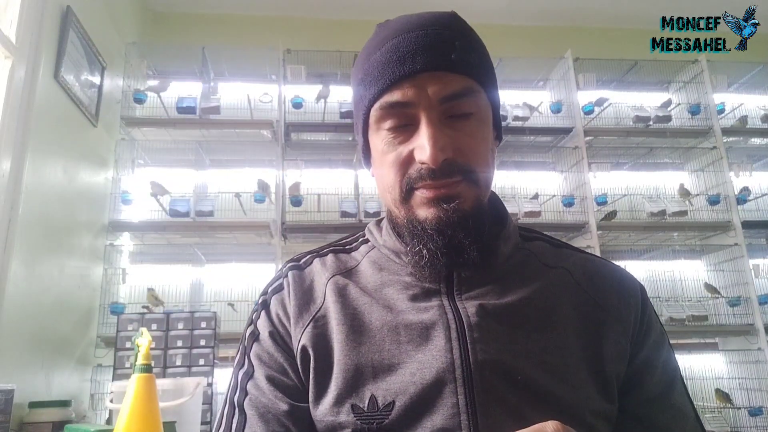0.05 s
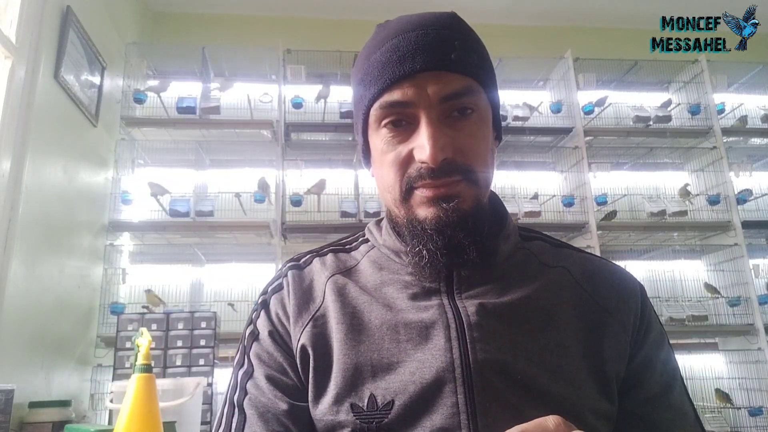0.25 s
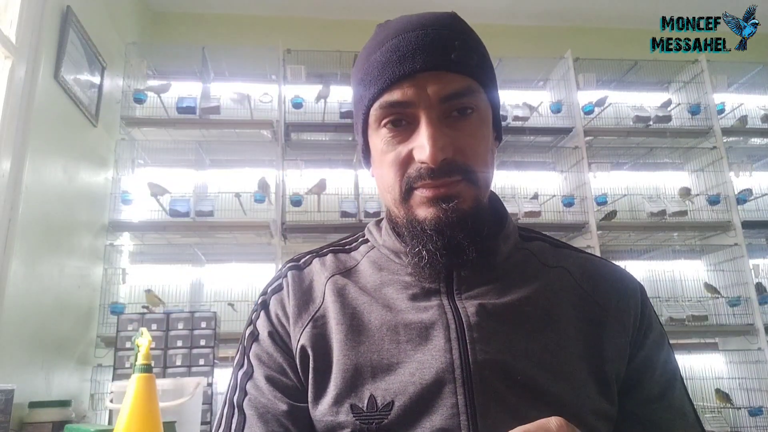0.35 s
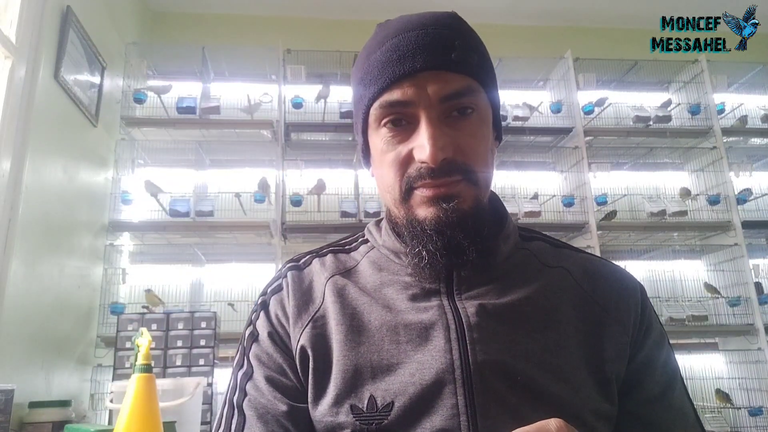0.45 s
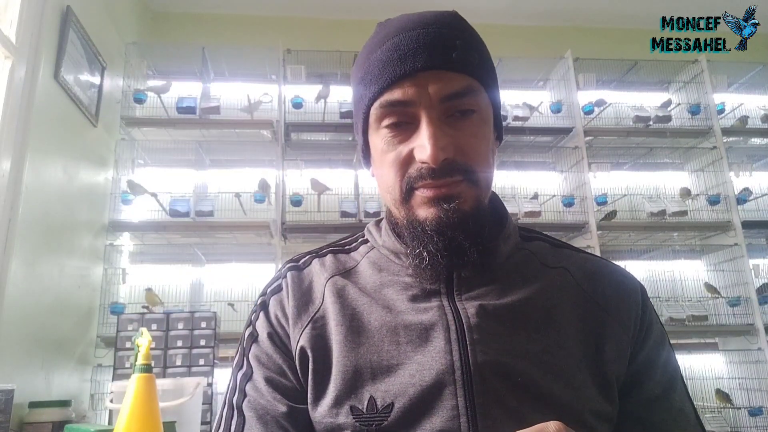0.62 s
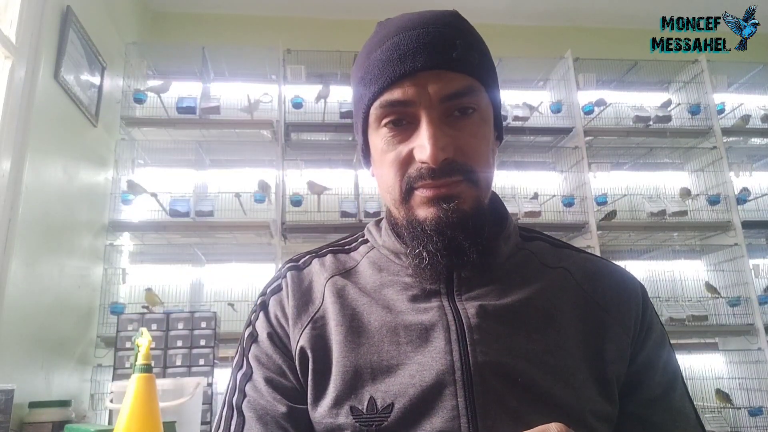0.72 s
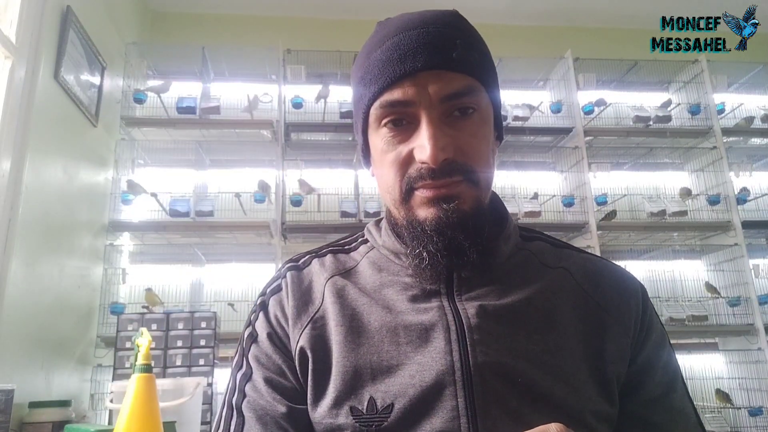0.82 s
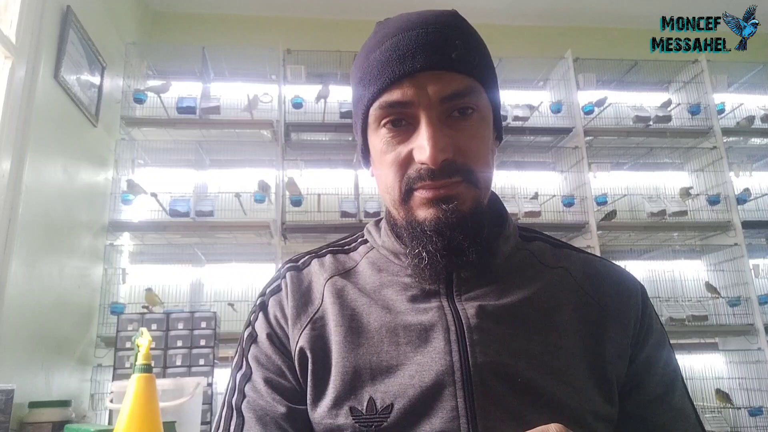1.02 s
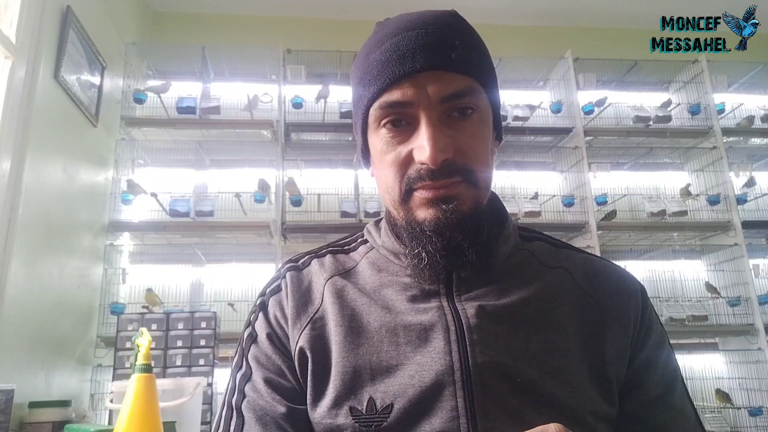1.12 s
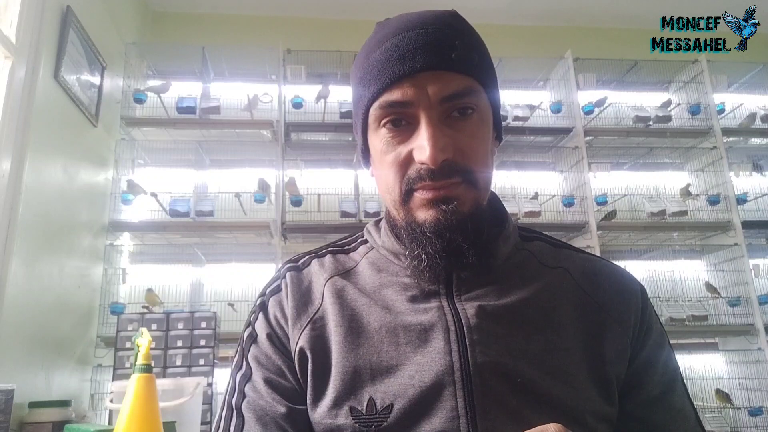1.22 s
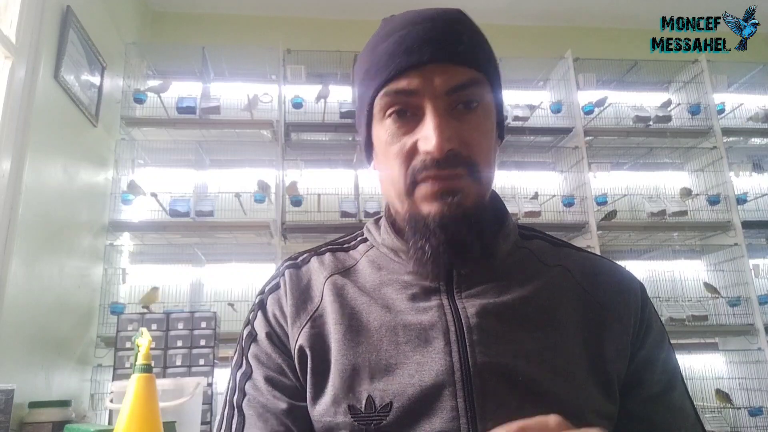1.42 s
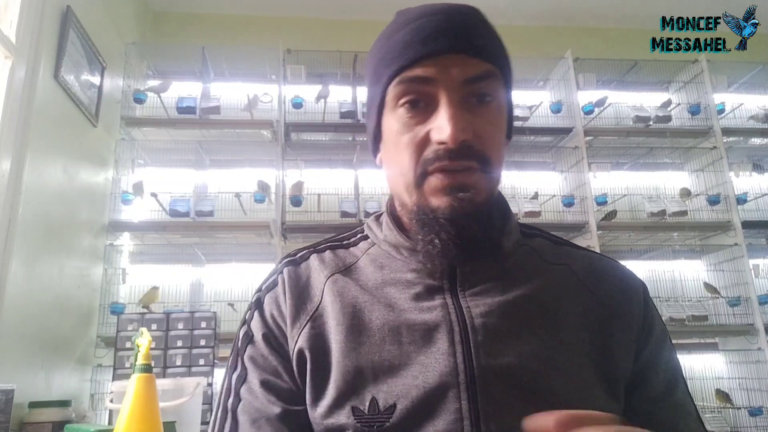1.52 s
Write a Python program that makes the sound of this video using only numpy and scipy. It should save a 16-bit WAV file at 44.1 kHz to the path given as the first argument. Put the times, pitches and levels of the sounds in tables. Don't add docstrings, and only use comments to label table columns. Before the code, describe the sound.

Caged canaries chirp and whistle in quick high phrases inside a small echoing bird room.

```python
import sys
import numpy as np
from scipy import signal
from scipy.fft import rfft, irfft, next_fast_len
from scipy.io import wavfile
from scipy.ndimage import uniform_filter1d, map_coordinates

SR = 44100
rng = np.random.default_rng(int(sys.argv[2]) if len(sys.argv) > 2 else 0)


def volts_from_db(level):
    exponent = np.asarray(level, float) / 20
    return 10 ** exponent


def master(y):
    cut = np.clip(np.atleast_2d(y).T, -1, 1)
    pcm = np.round(cut * 32767)
    wavfile.write(sys.argv[1], SR, pcm.astype(np.int16))


N = 68355

# frequency in Hz, density in dB per Hz.
AIR_COLOUR = [(20, -65), (55, -10.5), (95, -20), (280, -8), (490, -18), (1050, -13), (2000, -22),
              (5000, -24.5), (9000, -36), (15600, -43)]
# frequency in Hz, level in dB.
HUM_TONES = [(125, -71), (182, -69), (310, -70.5)]
# frequency in Hz, density in dB per Hz.
HISS_COLOUR = [(5760, -43), (9800, -24.5), (11700, -23), (12800, -15), (14600, -2), (15500, 0)]
# frequency in Hz, time to fall 60 dB in seconds.
ROOM_DECAY = [(500, 1), (3000, 0.49), (4200, 0.36), (6000, 0.39), (7000, 0.17), (12000, 0.1)]
# start in seconds, level in dB, time to fall 60 dB in seconds.
WING_BEATS = [(-.01, -49.5, 0.97), (0.051, -57.5, 0.54), (0.102, -45, 0.8), (0.141, -64.5, 0.27),
              (0.199, -53, 0.52), (.3, -55, 0.22), (0.419, -58, 0.6), (1.237, -76, 0.2), (1.311, -60, 0.6),
              (.96, -64, .4), (1.462, -61, .4), (0.481, -60.5, 0.69), (1.513, -43.5, 0.44),
              (1.531, -52, 0.42)]
# frequency in Hz, density in dB per Hz.
FEATHER_COLOUR = [(240, -49), (400, -24.5), (1200, -11.5), (2000, -20), (3060, -18), (3360, -18.5),
                  (5400, -14.5), (9660, -32.5), (15500, -51.5)]

# start in seconds, length in seconds, first and last pitch in Hz.
# Its level table holds one level in dB per call; its overtones are the 2nd and 3rd partial in dB.
CHATTER_CALLS = [(.455, .04, 5000, 5500), (.5, .05, 5600, 5300), (.105, .025, 6800, 7600),
                 (.42, .025, 5800, 6800), (.584, .03, 7000, 6300), (.885, .05, 7000, 7600),
                 (.2, .05, 4300, 5000), (.478, .04, 2300, 3000), (1.012, .03, 3300, 3800),
                 (1.335, .09, 2350, 2800), (.94, .05, 5700, 5300), (.555, .03, 2100, 2500),
                 (1.32, .05, 3200, 4000)]
CHATTER_LEVELS = [-48.5, -45.5, -45, -54.5, -38.5, -69, -45, -39, -41, -47, -40, -46, -48]
COO_CALLS = [
    (1.355, .05, 1050, 1065),
    (1.055, .04, 1100, 1090),
    (.555, .04, 1020, 1020),
    (.135, .03, 1250, 1280),
]
COO_LEVELS = [-51, -58.5, -60, -52]
COO_OVERTONES = [-40, -50]
FAR_CALLS = [(.08, .02, 3100, 3120), (.1, .02, 3900, 3900), (.158, .055, 3450, 3920),
             (.96, .03, 4150, 4150), (1.015, .045, 3950, 4130), (1.523, .03, 3000, 3090),
             (1.308, .16, 2900, 4530), (.63, .03, 7100, 7150), (.0, .03, 2250, 2250),
             (1.008, .022, 3300, 4120), (.478, .04, 2400, 3560), (.583, .075, 6900, 5300),
             (.678, .04, 4950, 4280), (.57, .03, 5400, 6000), (.1, .02, 5300, 5500)]
FAR_LEVELS = [-48, -46, -40.5, -50.5, -33, -31, -44.5, -52, -55.5, -36, -29.5, -30.5, -22, -35.5, -40]
FAR_OVERTONES = [-50, -44]
WHISTLE_CALLS = [(.485, .125, 4500, 4020), (.61, .05, 3530, 3560), (.643, .022, 3950, 3800),
                 (.658, .095, 5000, 5900), (.7, .07, 4200, 4850), (.768, .018, 4980, 5030),
                 (.815, .03, 4980, 5000), (.873, .03, 5020, 4970), (.785, .1, 5200, 5800),
                 (.93, .035, 5800, 5200), (.372, .1, 3330, 3520), (1.3, .02, 2850, 2900),
                 (.655, .05, 3600, 4300), (.42, .04, 4000, 4620), (.42, .02, 2200, 2310)]
WHISTLE_LEVELS = [-25.5, -30.5, -20, -22.5, -26.5, -18.5, -21, -24.5, -26.5, -33.5, -38.5, -47, -25, -41,
                  -44]
WHISTLE_OVERTONES = [-37, -35]
CHIRP_CALLS = [(.103, .025, 2250, 2600), (.112, .025, 2700, 3080), (.163, .03, 2300, 2850),
               (.222, .035, 2550, 2890), (.297, .035, 2500, 3030), (.57, .035, 2480, 2750),
               (.6, .06, 2750, 3190), (1.281, .02, 2540, 2620), (1.33, .022, 2400, 3050),
               (1.385, .028, 2400, 3170), (1.515, .016, 2300, 3050)]
CHIRP_LEVELS = [-44, -38, -35, -35, -28, -31, -32, -47, -37, -38, -43]
CHIRP_OVERTONES = [-8, -28]

CHIRP_BEND, WHISTLE_BEND, FAR_BEND = 4, 3.6, 6.5
CHIRP_WET_DB, WHISTLE_WET_DB, FAR_WET_DB = 5, 4, 5
CHIRP_RASP, WHISTLE_RASP, FAR_RASP, CHATTER_RASP = .42, .2, .35, 1.3
ATTACK_S, RELEASE_S = .0035, .008
QUAVER_HZ, TREMBLE_DB = 29, 3.5
CALL_SPAN, TAIL_SPAN = SR // 4, 2 * SR // 3


def unit(x):
    return x / np.sqrt(np.mean(x ** 2) + 1e-20)


def along(points, hz):
    point_hz, value = np.transpose(points)
    return np.interp(np.log(hz + 1), np.log(point_hz + 1), value)


def wobble(rate_hz, count=N):
    knots = rng.standard_normal(int(count * rate_hz / SR) + 4)
    return map_coordinates(knots, [np.arange(count) * rate_hz / SR])


def filtered(x, response):
    size = next_fast_len(N + SR // 2)
    mirrored = np.concatenate([x, x[..., :-SR // 20:-1]], axis=-1)
    spectrum = rfft(mirrored, size) * response(np.fft.rfftfreq(size, 1 / SR))
    return irfft(spectrum, size)[..., :N]


def coloured_noise(noise, colour):
    return unit(filtered(noise, lambda hz: volts_from_db(along(colour, hz))))


def air():
    t = np.arange(N) / SR
    noise = coloured_noise(rng.standard_normal(N), AIR_COLOUR)
    hum = 0
    for hz, db in HUM_TONES:
        hum = hum + volts_from_db(db + 2.3 * wobble(6.2)) * np.sin(2 * np.pi * hz * t + .8 * wobble(20))
    return volts_from_db(-60.5 + 0.97 * wobble(5.6)) * noise + hum


def microphone_hiss(dry):
    loudness = unit(np.abs(uniform_filter1d(dry ** 2, SR // 50)) ** (1.6 / 2))
    z = signal.stft(rng.standard_normal(N), nperseg=512)[2]
    patches = uniform_filter1d(rng.standard_normal(z.shape), size=6, axis=0)
    patches = unit(uniform_filter1d(patches, size=6, axis=1))
    hiss = signal.istft(z * volts_from_db(5.5 * patches), nperseg=512)[1][:N]
    return (volts_from_db(-86) + volts_from_db(-64) * loudness) * coloured_noise(hiss, HISS_COLOUR)


def wings():
    t = np.arange(N) / SR
    beats = 0
    for start_s, db, t60_s in WING_BEATS:
        fall = volts_from_db(db - 60 * np.clip(t - start_s, 0, 9) / t60_s)
        beats = beats + fall * np.clip((t - start_s) / 0.0045, 0, 1)
    flutter = volts_from_db(2.45 * wobble(59.63))
    return beats * flutter * coloured_noise(rng.standard_normal(N), FEATHER_COLOUR)


def room(x):
    hz, t, z = signal.stft(rng.standard_normal(SR)[:TAIL_SPAN], SR, nperseg=256)
    late = volts_from_db(-60 * t / np.clip(along(ROOM_DECAY, hz), .05, 3)[:, None])
    early = volts_from_db(6 - 60 * t / .15)
    tail = signal.istft(z * (late + early), SR, nperseg=256)[1]
    delayed = np.pad(x, (90, 0))
    return signal.fftconvolve(delayed, tail / np.linalg.norm(tail))[:TAIL_SPAN]


def birds(calls, levels_db, overtones_db, bend, wet_db, rasp):
    out = np.zeros(N + SR)
    t = np.arange(CALL_SPAN) / SR
    for (start_s, length_s, first_hz, last_hz), db in zip(calls, levels_db):
        glide_left = (np.exp(-bend * t / length_s) - np.exp(-bend)) / (1 - np.exp(-bend))
        pitch_hz = last_hz + (first_hz - last_hz) * glide_left
        pitch_hz = pitch_hz + QUAVER_HZ * wobble(148.3, count=CALL_SPAN)
        phase = 2 * np.pi * np.cumsum(pitch_hz) / SR + rasp * wobble(500, count=CALL_SPAN)
        tone = np.sin(phase)
        tone += volts_from_db(overtones_db[0]) * np.sin(2 * phase)
        tone += volts_from_db(overtones_db[1]) * np.sin(3 * phase)
        shape = np.clip(t / ATTACK_S, 0, 1) * np.clip((length_s - t) / RELEASE_S + 1, 0, 1)
        level = volts_from_db(db - wet_db + TREMBLE_DB * wobble(150, count=CALL_SPAN))
        call = level * shape ** 2 * tone
        start = round(start_s * SR)
        out[start:][:CALL_SPAN] += call
        out[start:][:TAIL_SPAN] += volts_from_db(wet_db) * room(call)
    return out[:N]


def far_birds():
    far = birds(CHATTER_CALLS, CHATTER_LEVELS, COO_OVERTONES, CHIRP_BEND, FAR_WET_DB, CHATTER_RASP)
    far += birds(COO_CALLS, COO_LEVELS, COO_OVERTONES, CHIRP_BEND, FAR_WET_DB, WHISTLE_RASP)
    far += birds(FAR_CALLS, FAR_LEVELS, FAR_OVERTONES, FAR_BEND, FAR_WET_DB, FAR_RASP)
    return far


def near_birds():
    near = birds(WHISTLE_CALLS, WHISTLE_LEVELS, WHISTLE_OVERTONES, WHISTLE_BEND, WHISTLE_WET_DB, WHISTLE_RASP)
    near += birds(CHIRP_CALLS, CHIRP_LEVELS, CHIRP_OVERTONES, CHIRP_BEND, CHIRP_WET_DB, CHIRP_RASP)
    return near


def scene():
    return (air() + wings() + far_birds() + near_birds())[None]


def masked(x):
    hz, _, z = signal.stft(x, SR, nperseg=1024, boundary="even")
    power = uniform_filter1d(np.abs(z) ** 2, size=9, axis=1)
    power = np.abs(uniform_filter1d(power, size=3, axis=2))
    loudest = power[:, hz > 4700].max(axis=1, keepdims=True)
    treble = ((hz > 6250) & (hz < 10500))[:, None]
    weak = (power < volts_from_db(2 * -50) * loudest) & treble
    return signal.istft(z * ~weak, SR, nperseg=1024)[1][:, :N]


def low_pass(x):
    return signal.sosfilt(signal.butter(12, 15680, fs=SR, output="sos"), x)


def record(dry):
    mix = dry + microphone_hiss(dry)
    mix = filtered(mix, lambda hz: volts_from_db(-21.5 * np.exp(-((hz - 9550) / 756) ** 2)))
    mix = masked(mix)
    return low_pass(mix)


dry = scene()
out = record(dry)
master(out)
```